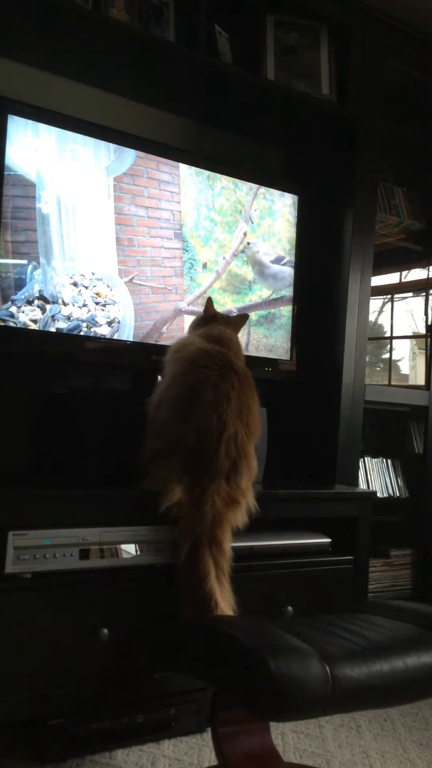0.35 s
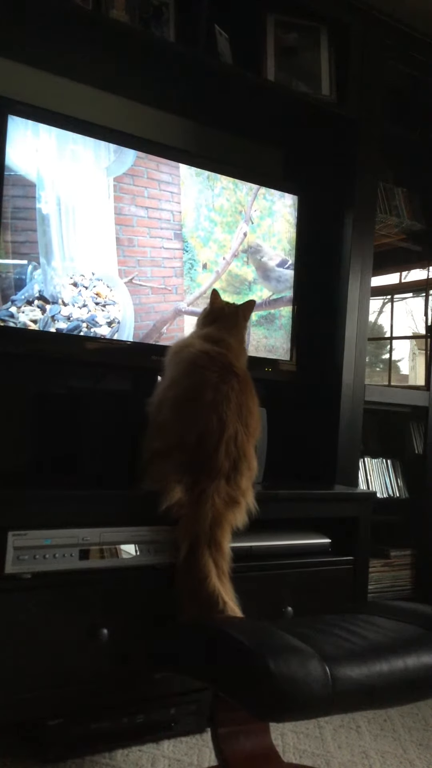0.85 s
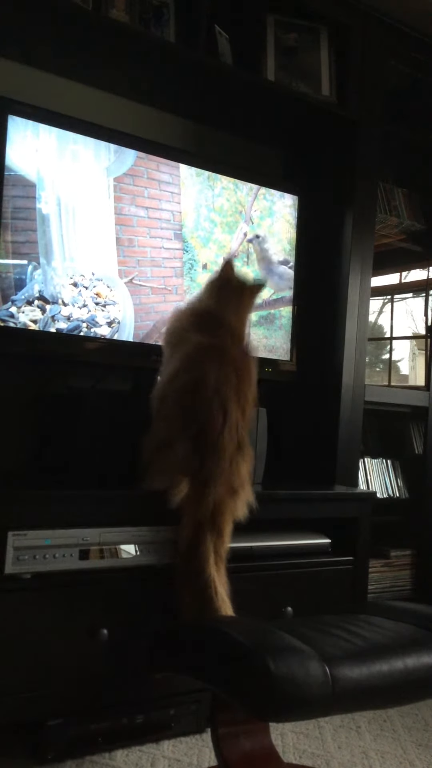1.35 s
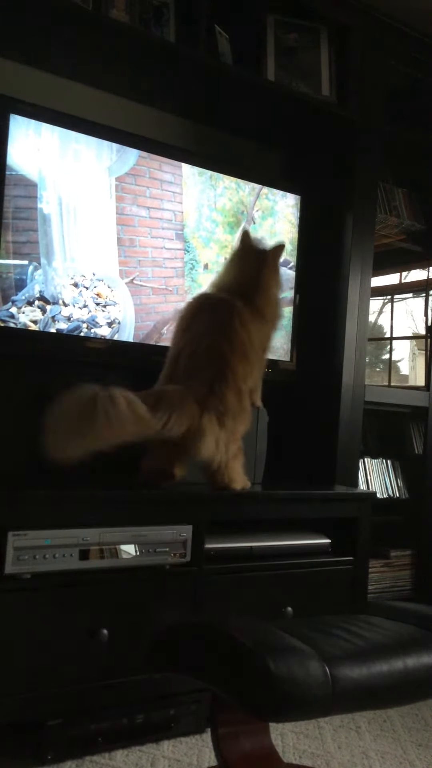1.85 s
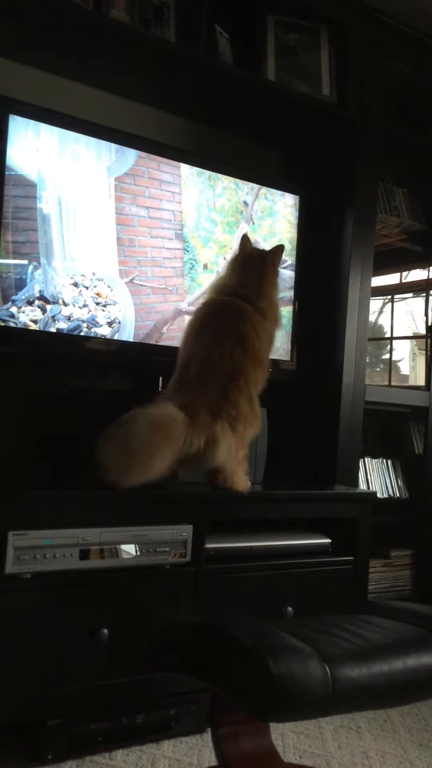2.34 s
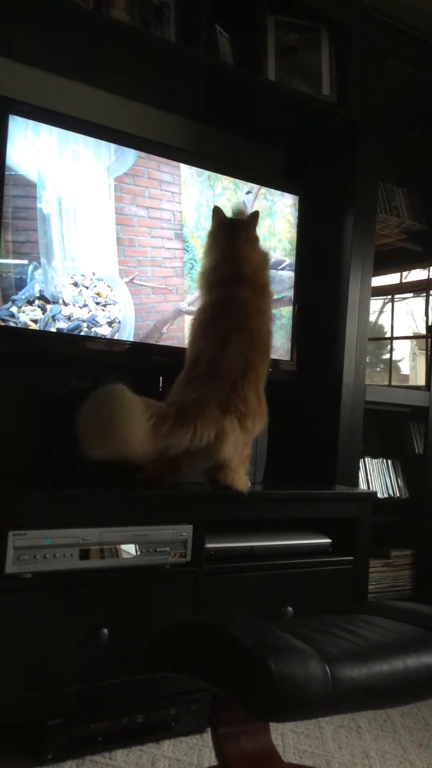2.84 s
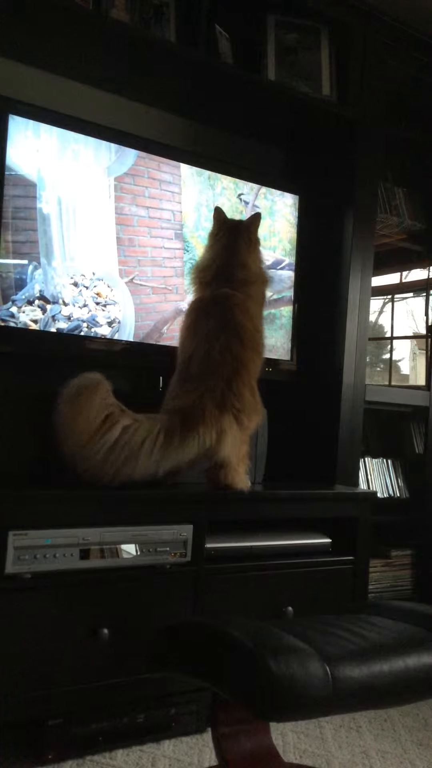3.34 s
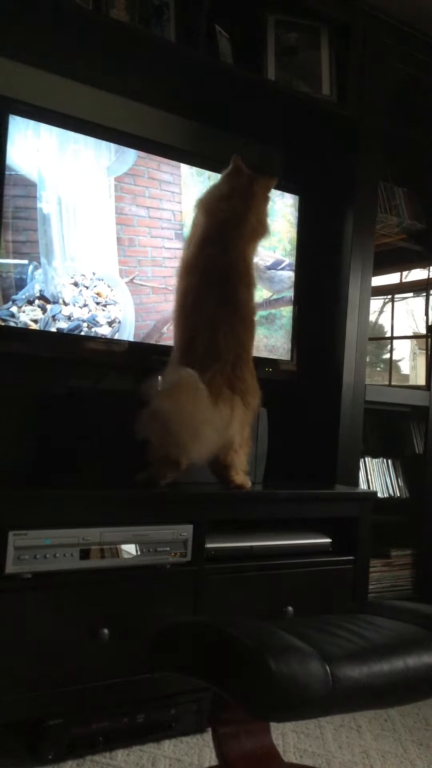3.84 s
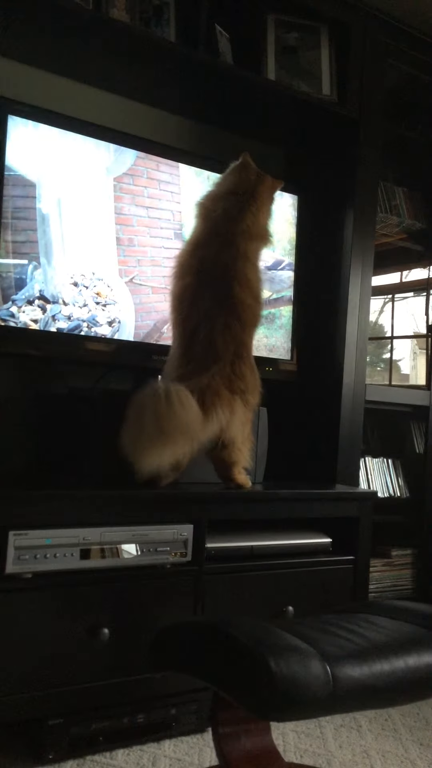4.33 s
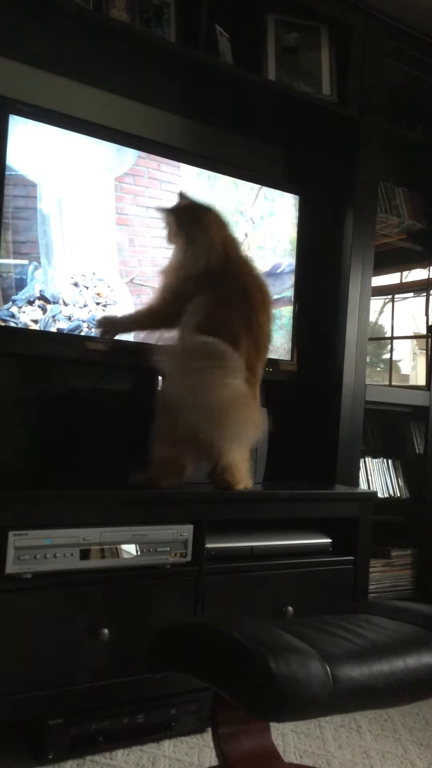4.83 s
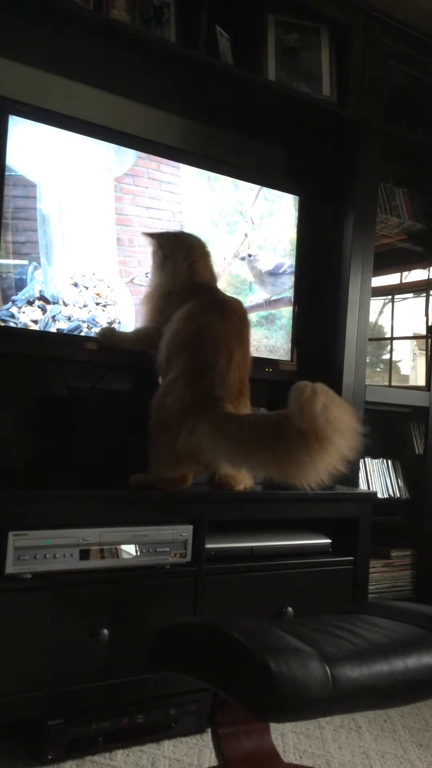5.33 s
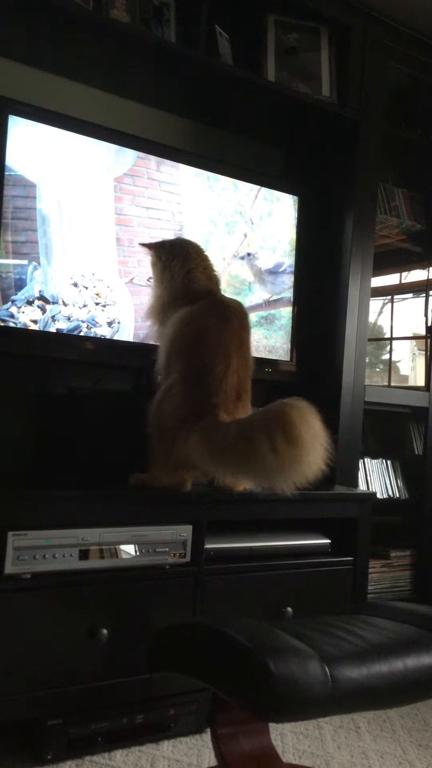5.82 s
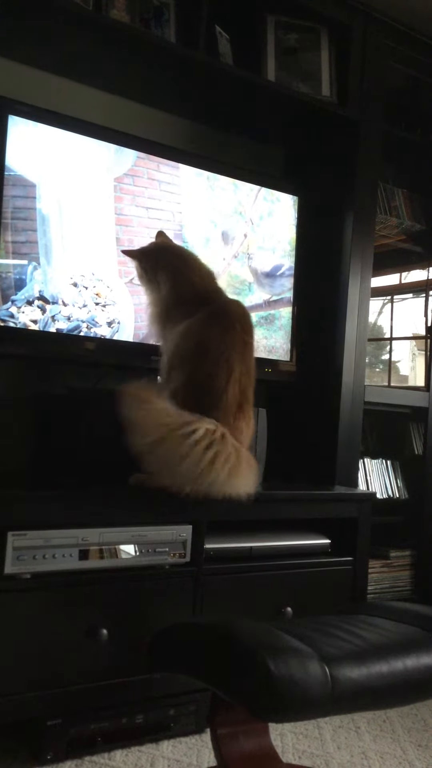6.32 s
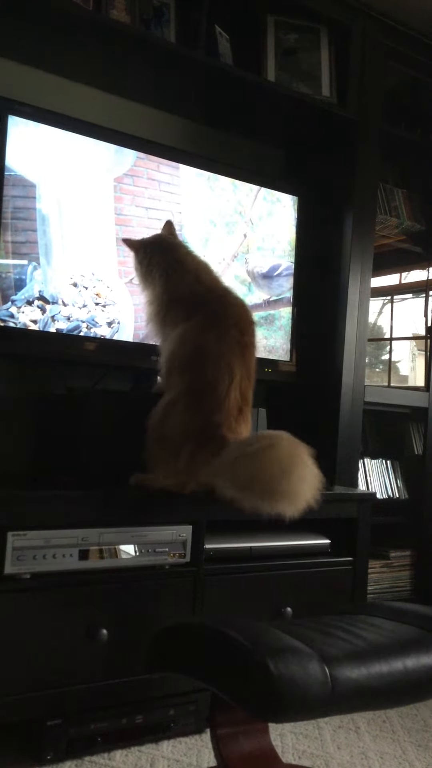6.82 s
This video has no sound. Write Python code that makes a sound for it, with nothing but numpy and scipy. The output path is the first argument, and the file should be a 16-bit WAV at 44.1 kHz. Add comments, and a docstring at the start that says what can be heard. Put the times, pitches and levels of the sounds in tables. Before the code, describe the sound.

In a furnished living room, a low engine drone from outside and faint hiss run throughout. After a quiet start, a cat lands on a wooden cabinet with a cluster of soft hollow knocks, then another double thump. Lighter claw taps and muffled pats follow, ending in one sharp click, then sparse faint touches. A phone microphone listens from a few metres away.

```python
"""A cat's paws knock, pat and scratch on a wooden cabinet in a furnished room, a few metres from a phone microphone.
Each contact is a swell of noise that rings resonances of panel, shelves, pad and claw; fur adds soft hiss.
An engine drones outside, a firing tone with overtones shifting down in pitch, heard through low room resonances.
Room air and microphone hiss, all shaped noise, lie under everything.
A few faint chirps, short sliding sines, come from a loudspeaker."""
import sys
import numpy as np
from scipy import signal
from scipy.fft import rfft, irfft, next_fast_len
from scipy.io import wavfile
from scipy.ndimage import uniform_filter1d, map_coordinates

SR = 44100
rng = np.random.default_rng(int(sys.argv[2]) if len(sys.argv) > 2 else 0)


def bounce(signal):
    """Save signal as a 16-bit WAV file at the path given by the first command-line argument."""
    frames = np.transpose(np.atleast_2d(signal))
    limited = np.clip(frames, -1, 1)
    pcm = np.round(limited * 32767).astype(np.int16)
    wavfile.write(sys.argv[1], SR, pcm)


def to_linear_factor(level_db):
    """Convert decibel levels (scalar or array-like) to linear amplitude factors."""
    exponent = np.asarray(level_db, float) / 20
    return 10 ** exponent


N = 316505  # samples

# resonances of pad on wood: centre_hz, width_hz, gain_db
PAD_MODES = [(717, 56, -2), (939, 78, 3.5), (1055, 94, 1.5), (1170, 46, 7.5), (1300, 72, 3), (1500, 70, -1),
             (1570, 67, 4.5), (1678, 74, 5), (1853, 117, 3), (2160, 320, -10)]
# resonances of claw on wood: centre_hz, width_hz, gain_db
CLAW_MODES = [(2060, 63, 3), (2360, 264, 10.5), (2795, 250, 12.5), (3550, 340, 0), (4340, 320, -3),
              (5530, 690, -13), (6500, 650, -16)]


def unit(x):
    """Brings a signal to rms 1."""
    return x / np.sqrt(np.mean(x ** 2) + 1e-20)


def along(points, hz):
    """Reads (Hz, value) points on a log frequency axis."""
    point_hz, value = np.transpose(points)
    return np.interp(np.log(hz + 1), np.log(point_hz + 1), value)


def curves(rows):
    """One value per sample for each column after the time."""
    s, *columns = np.transpose(rows)
    return [np.interp(np.arange(N) / SR, s, column) for column in columns]


def wobble(rate):
    """A smooth random curve, rate knots a second."""
    knots = rng.standard_normal(int(N * rate / SR) + 4)
    return map_coordinates(knots, [np.arange(N) * rate / SR])


def filtered(x, response):
    """Multiplies the spectrum of x by a complex response of frequency."""
    size = next_fast_len(len(x) + 8192)
    return irfft(rfft(x, size) * response(np.fft.rfftfreq(size, 1 / SR)), size)[:len(x)]


def resonant(x, modes, fall_hz):
    """x through (Hz, width Hz, dB) resonances, dull above fall_hz, brought to rms 1."""
    def response(f):
        peaks = 0
        for k, (centre, width, db) in enumerate(modes):
            sign = (-1) ** k  # neighbouring modes swing in opposite senses
            peaks = peaks + sign * to_linear_factor(db) * 1j * f * width / (centre * centre - f * f + 1j * f * width)
        return peaks / (1 + 1j * f / fall_hz) ** 2
    return unit(filtered(x, response))


def coloured(x, spectrum):
    """x with a smooth spectrum, brought to rms 1."""
    return unit(filtered(x, lambda hz: to_linear_factor(along(spectrum, hz))))


def combed(x, step_hz, depth_db):
    """Reflections off walls and furniture leave fixed fine peaks and dips in a steady noise."""
    knots = rng.standard_normal(SR // 20)
    return unit(filtered(x, lambda hz: to_linear_factor(depth_db * map_coordinates(knots, [hz / step_hz]))))


def patchy(x, depth_db):
    """The noise swells and fades in small patches of time and pitch."""
    z = signal.stft(x, nperseg=512)[2]
    field = uniform_filter1d(rng.standard_normal(z.shape), size=4, axis=0)
    field = uniform_filter1d(field, size=12, axis=1)
    return signal.istft(z * to_linear_factor(depth_db * unit(field)), nperseg=512)[1][:N]


def tone(hz, db, waver_rad, flutter_db, rate):
    """A sine whose phase and level wander."""
    level = np.sqrt(2) * to_linear_factor(db + flutter_db * wobble(rate))
    return level * np.sin(2 * np.pi * np.cumsum(hz) / SR + waver_rad * wobble(rate))


def tail():
    """One answer of the room: noise in which each frequency dies at its own speed."""
    # decay of the furnished room: pitch_hz, t60_s
    room_decay = [(200, 0.038), (500, 0.4), (2000, 0.31), (10000, 0.075)]
    hz, t, z = signal.stft(rng.standard_normal(SR // 2), SR, nperseg=256)
    fading = z * to_linear_factor(-60 * t / along(room_decay, hz)[:, None])
    answer = signal.istft(fading, SR, nperseg=256)[1]
    return answer / np.linalg.norm(answer)


def roomed(x, wet_db):
    """Direct sound, then the room 6 ms later."""
    total = len(x) + SR // 2
    late = signal.fftconvolve(np.pad(x, (260, 0)), tail())[:total]
    return np.pad(x, (0, SR // 2)) + to_linear_factor(wet_db) * late


def add_at(out, start_s, sound):
    """Lays a sound into the track at its start time."""
    first = round(start_s * SR)
    out[first:first + len(sound)] += sound


def air():
    """Broad rumble, noise caught in the room's resonances and an even hiss."""
    # broad low noise before its wander: time_s, rumble_db, boom_db
    air_levels = [(0, -50, -54.5), (.4, -54.5, -56), (.8, -46.5, -53.5), (1.5, -47, -56),
                  (2.15, -42, -56.5), (2.5, -51, -56), (3.3, -48.5, -53.5), (3.75, -53.5, -54),
                  (3.95, -43.5, -53.5), (4.5, -50.5, -56.5), (4.85, -46, -51.5), (5.05, -51.5, -51.5),
                  (5.6, -47.5, -55.5), (6.4, -50.5, -55), (7.18, -48.5, -63)]
    # relative spectrum of the rumble: pitch_hz, level_db_per_hz
    rumble_spectrum = [(18, -27), (30, -24.5), (45, -7), (70, -9.5), (100, -1.5), (135, -9.5), (160, -12.5),
                       (200, -13), (400, -120)]
    # low room resonances: centre_hz, width_hz, gain_db
    boom_modes = [(328, 96.5, -4.5), (407.6, 11.3, -7.5), (252.7, 19, -9), (180.5, 17, 3.5)]
    # middle and upper room resonances: centre_hz, width_hz, gain_db
    murmur_modes = [(477, 33, -3), (660, 114, -3), (705, 113, 2), (937, 109, 2.5), (1234.5, 55, 4),
                    (1645, 123, -1.5), (2205, 120, -11.5), (2598, 258, -9.5), (3370, 480, -15),
                    (4000, 500, -12.5), (4800, 240, -15), (5060, 250, -31)]
    # relative spectrum of the hiss: pitch_hz, level_db_per_hz
    hiss_spectrum = [(3000, -44), (5000, 3), (5900, -4), (6900, 0), (8500, -2), (10200, -5), (11300, -2.5),
                     (11800, -2), (12300, -2), (13200, -8), (15000, -7.5), (15300, -50)]
    murmur_db, hiss_db = -65, -80.5
    rumble_db, boom_db = curves(air_levels)
    white = rng.standard_normal((4, N))
    waver = wobble(8.1)  # one slow random waver shared by the murmur and the hiss
    rumble = to_linear_factor(rumble_db + 2.35 * wobble(12)) * coloured(white[0], rumble_spectrum)
    boom = to_linear_factor(boom_db + 2.5 * wobble(2.94)) * resonant(white[1], boom_modes, fall_hz=650)
    murmur = resonant(patchy(white[2], depth_db=2.0), murmur_modes, fall_hz=5300)
    murmur = to_linear_factor(murmur_db + 0.5 * waver) * combed(murmur, step_hz=20, depth_db=3.5)
    hiss = combed(coloured(white[3], hiss_spectrum), step_hz=28, depth_db=2.8)
    return rumble + boom + murmur + to_linear_factor(hiss_db + 0.67 * waver) * hiss


def engine():
    """A low firing tone and its overtones; an order stands out while it lies on a resonance of the room."""
    # engine speed: time_s, firing_hz
    firing = [(0, 83.54), (.95, 84.77), (1.13, 67.84), (2.2, 64), (3.5, 63.57), (4.5, 61.35), (5.2, 60.32),
              (6, 59.75), (7.18, 58.18)]
    # firing tone indoors, before smoothing and a 2.5 dB lift: time_s, level_db
    firing_level = [(0.0, -35), (0.035, -57), (0.16, -60.5), (0.82, -45), (0.86, -53), (1.16, -44),
                    (1.28, -59), (1.32, -45), (1.86, -51), (1.9, -41), (2.08, -68), (2.24, -41),
                    (2.46, -54.5), (2.76, -41.5), (2.84, -47), (2.88, -71), (3.24, -44.5), (3.34, -58),
                    (3.44, -45.5), (3.84, -57.5), (3.88, -47), (4.78, -42.5), (4.84, -51.5), (5.26, -40.5),
                    (6.56, -47), (6.71, -45), (7.18, -51)]
    # overtones before smoothing, order gain and room lift: time_s, level_db
    overtone_level = [(0.0, -60.5), (0.4, -66.5), (0.42, -66), (0.56, -57), (1.56, -57.5), (1.58, -51.5),
                      (2.32, -57.5), (2.58, -47.5), (3.0, -53.5), (3.34, -42), (3.38, -75), (3.42, -45.5),
                      (3.8, -52), (4.22, -41.5), (4.34, -54.5), (4.42, -39.5), (4.48, -61.5), (4.68, -43),
                      (4.78, -49), (4.88, -39), (5.04, -62), (5.1, -42.5), (5.16, -61), (5.24, -43),
                      (5.5, -49), (5.86, -47), (5.9, -62), (6.0, -42), (6.13, -52), (6.2, -39.5),
                      (6.34, -49.5), (6.54, -41), (6.86, -46.5), (7.18, -46.5)]
    # overtones heard: order (multiple of the firing pitch), gain_db
    orders = [(2, 1.5), (3, -0.5), (4, 4), (5, 0.5), (6, -12), (8, -3)]
    # room resonances that lift whichever order passes through them: centre_hz, width_hz, gain_db
    lift_modes = [(132, 38, -15), (181, 35, 0), (340.5, 38, -7.5), (473.4, 14.4, -21.5)]
    # narrow room resonance: centre_hz, width_hz, gain_db
    singing_modes = [(341.2, 4.5, 0)]
    # loudness of that resonance, before a 1 dB cut: time_s, level_db
    singing_level = [(0.0, -75), (0.24, -54.5), (0.3, -74), (0.58, -56), (0.7, -83), (0.86, -60),
                     (1.28, -71), (1.69, -65), (1.78, -76), (1.86, -65), (4.65, -63.5), (4.73, -55.5),
                     (5.29, -64.5), (6.27, -50.5), (6.31, -71), (6.59, -53.5), (7.11, -57.5), (7.17, -51)]
    hz, = curves(firing)
    low_db = uniform_filter1d(curves(firing_level)[0], size=900)
    overtone_db = uniform_filter1d(curves(overtone_level)[0], size=900)
    calm_db = uniform_filter1d(overtone_db, size=SR // 2)  # the higher orders follow only the slow swell

    def lift(f):
        return sum(to_linear_factor(db) / (1 + (2 * (f - centre) / width) ** 4) for centre, width, db in lift_modes)

    overtones = np.zeros(N)
    for k, db in orders:
        order_db = (calm_db if k > 3 else overtone_db) + db
        overtones += lift(k * hz) * tone(k * hz, order_db, 0.3 + 0.1 * k, 0.8 + 0.35 * k, rate=14)
    singing = resonant(rng.standard_normal(N), singing_modes, fall_hz=900)
    singing *= to_linear_factor(curves(singing_level)[0] - 1.0)
    return tone(hz, low_db + 2.5, waver_rad=0.12, flutter_db=1.5, rate=12) + overtones + singing


def chirps():
    """Short husky whistles, sines that slide down a little under a rounded swell."""
    # faint chirps, sounding 3 % above the pitch at first and 0.8 % at last:
    # middle_s, pitch_hz, level_db, length_s
    chirp_list = [(2.171, 4000, -71, 0.044), (2.312, 3800, -71, 0.064), (3.762, 8250, -76, .05),
                  (3.763, 3800, -62, 0.033), (3.982, 1758, -63, 0.028), (5.184, 2037, -60.5, 0.034),
                  (5.21, 2150, -71, 0.027), (6.709, 2820, -67.5, 0.046)]
    out = np.zeros(N + SR)
    for s, hz, db, length in chirp_list:
        t = np.arange(round(length * SR)) / SR
        husk = .6 + .8 * unit(uniform_filter1d(rng.standard_normal(SR // 10), size=70))[:len(t)]
        swell = np.sin(np.pi * t / length) ** 2
        whistle = np.sin(2 * np.pi * hz * t * (1.03 - 0.011 * t / length))
        add_at(out, s - length / 2, roomed(to_linear_factor(db) * husk * swell * whistle, wet_db=-13))
    return out[:N]


def brushes():
    """Fur brushing past without a knock: a soft swell of hiss and finer fizz for each stroke."""
    # strokes of fur: middle_s, hiss_db, length_s, fizz_db (against the hiss)
    strokes = [(0.62, -81, 0.099, -11), (1.454, -75, 0.057, -3), (1.63, -67, 0.046, -10),
               (1.665, -76, .05, -16), (1.752, -72, 0.055, -6), (3.533, -77, 0.024, 0),
               (3.626, -69, 0.034, -15), (3.74, -85, .12, 4), (3.98, -87.5, .18, 2),
               (4.837, -83, 0.24, 1.5), (4.946, -80, 0.022, 6), (6.73, -76, .05, -5)]
    # relative spectrum of the hiss: pitch_hz, level_db_per_hz
    stroke_spectrum = [(700, -28), (2500, 7.5), (5000, 3), (7500, -2), (11500, -17), (14000, -12),
                       (15200, -18), (15400, -47)]
    # relative spectrum of the fizz: pitch_hz, level_db_per_hz
    fizz_spectrum = [(6000, -40), (9000, 0), (12500, 1), (15000, -3), (15400, -47)]
    t, out = np.arange(N) / SR, np.zeros(N)
    hiss = to_linear_factor(3.0 * wobble(60)) * coloured(rng.standard_normal(N), stroke_spectrum)
    fizz = to_linear_factor(3.0 * wobble(60)) * coloured(rng.standard_normal(N), fizz_spectrum)
    for s, db, length, fizz_db in strokes:
        swell = np.exp(-(2 * (t - s) / length) ** 2)
        out += to_linear_factor(db) * swell * (hiss + to_linear_factor(fizz_db) * fizz)
    return out


def shuffles():
    """A sliding pad catches and slips at random; each slip rings the wood and a little of the claw."""
    # pads sliding on the wood between contacts: middle_s, level_db, length_s
    slides = [(1.635, -61, .06), (1.69, -62, .1), (2.06, -62, .07), (3.64, -63, .06), (3.759, -70, .08),
              (3.93, -68, 0.13), (4.366, -70, .16), (4.64, -69, .12), (4.78, -69, .16),
              (6.085, -69.5, 0.23)]
    slips_per_s, slip_spread_db, scrape_db = 1500, 14, -11  # rate, range of size, the claw's share
    t, chance = np.arange(N) / SR, rng.random((2, N))
    slips = (chance[0] < slips_per_s / SR) * to_linear_factor(slip_spread_db * chance[1])
    slips = slips * rng.choice([-1, 1], size=N)
    rub = resonant(slips, PAD_MODES, fall_hz=3000)
    rub += to_linear_factor(scrape_db) * resonant(slips, CLAW_MODES, fall_hz=8240)
    swells = sum(to_linear_factor(db) * np.exp(-(2 * (t - s) / length) ** 2) for s, db, length in slides)
    return roomed(rub * swells, wet_db=-6.5)[:N]


def ticks():
    """A claw tip clicks on the hard finish: a crack under a millisecond long rings the claw's resonances."""
    # bare claw tips, before a 22 dB cut: start_s, level_db, treble_db (against the claw)
    claw_tips = [(3.605, -57, -20), (3.868, -65, -16), (4.9331, -42, -21), (4.9372, -53.5, 1)]
    out, t = np.zeros(N + SR), np.arange(SR // 20) / SR
    for s, db, treble_db in claw_tips:
        crack = to_linear_factor(-60 * t / .0025) * rng.standard_normal(len(t))
        treble = resonant(crack, [(11900, 2400, 0)], fall_hz=15000)
        click = resonant(crack, CLAW_MODES, fall_hz=8200) + to_linear_factor(treble_db) * treble
        add_at(out, s, roomed(to_linear_factor(db - 22.0) * click, wet_db=-0.5))
    return out[:N]


def thuds():
    """Soft weight landing: a padded push sets one low panel mode and a neighbour swinging."""
    # soft landings, level before the rise and fall: start_s, level_db, pitch_hz, rise_s, t60_s
    landings = [(1.607, -30, 400, 0.0023, 0.031), (1.615, -35.5, 337, 0.0023, 0.087),
                (1.641, -28.5, 105, 0.0054, 0.17), (1.645, -38.5, 235, 0.0044, 0.14),
                (1.67, -36.5, 266.4, .006, 0.16), (1.81, -24.5, 266, 0.0069, 0.071),
                (2.023, -24.5, 280, 0.0067, 0.069), (2.037, -25.5, 254, 0.0044, 0.074),
                (2.921, -36, 319, 0.0048, 0.069), (3.61, -40.5, 393.5, 0.0021, 0.11),
                (3.866, -36.5, 315, 0.0055, 0.13), (4.574, -40, 276, 0.0054, 0.089),
                (4.944, -36.5, 321, 0.0046, 0.15), (4.952, -32, 235, 0.0034, 0.071)]
    out, t = np.zeros(N + SR), np.arange(SR // 5) / SR
    for s, db, hz, rise, t60 in landings:
        swing = np.sin(2 * np.pi * hz * t) + .3 * np.sin(2 * np.pi * .8 * hz * t)
        push = 1 - np.exp(-(t / rise) ** 2)
        add_at(out, s, roomed(to_linear_factor(db - 60 * t / t60) * push * swing, wet_db=-8.0))
    return out[:N]


def paws():
    """A pad rolls onto the wood: a swell of uneven small jolts rings panel and shelves, claw and fur brush along."""
    # paw contacts, knock before a 5 dB cut: start_s, knock_db, claw_db (against the knock),
    # contact_s (time to the fullest press), spot_hz (pitch that the spot under the pad favours)
    contacts = [(.725, -72, 8.5, .0072, 1200), (1.605, -55, -8, 0.0061, 700),
                (1.622, -46, -14, 0.0086, 900), (1.628, -52, -7, 0.0084, 1910),
                (1.648, -51, -8, 0.013, 1800), (1.668, -48.5, -20, 0.0084, 1060),
                (1.69, -56.5, -8, 0.014, 1500), (1.755, -51, -15, 0.011, 1240), (1.811, -55, -5, .008, 990),
                (2.016, -43, -12.5, 0.0065, 790), (2.021, -45.5, -15, 0.0088, 1870),
                (2.024, -41.5, -16, 0.01, 1300), (2.04, -46, -21, 0.006, 840), (2.725, -69, 5, .011, 2000),
                (3.535, -64, -4, .008, 900), (3.604, -51.5, 1, 0.0037, 1210),
                (3.616, -57.5, -4.5, 0.016, 900), (3.734, -65, 2, 0.014, 1200),
                (3.762, -69, -7, 0.0068, 1200), (3.865, -55, -3, 0.0062, 990), (3.9, -68, -4, 0.029, 1210),
                (4.299, -60.5, -28, 0.029, 1199), (4.348, -58, -22, 0.016, 1680),
                (4.41, -60.5, -25, 0.019, 940), (4.514, -52, -15, 0.01, 1490),
                (4.569, -52, -4, 0.0086, 900), (4.611, -54, -22, 0.0067, 1280),
                (4.666, -57, -24, .013, 1180), (4.716, -54.5, -6, 0.009, 1700),
                (4.748, -51.5, -24, 0.0084, 950), (4.803, -65, 2, 0.01, 1770),
                (4.831, -55, -27, 0.013, 1310), (4.933, -48, 6, 0.0037, 2000),
                (4.938, -50, -9, 0.0097, 1700), (4.944, -56, -15, 0.0085, 1800),
                (5.15, -56, -14, 0.011, 1582), (5.742, -69, 0, 0.0098, 1201),
                (5.998, -59, -27, 0.053, 1211), (6.19, -62, -16, .0076, 1200),
                (6.7, -67.5, -1, 0.028, 1790), (7.16, -50.5, -16, 0.0072, 1212)]
    # panel under the pad: centre_hz, width_hz, gain_db
    panel_modes = [(207, 18, -2), (275, 59, 7), (310, 114, -1.5), (400, 130, -9)]
    # shelves: centre_hz, width_hz, gain_db
    shelf_modes = [(515, 68, 1), (650, 49, 1.3), (791, 45, 1.6)]
    # relative spectrum of the fur: pitch_hz, level_db_per_hz
    fur_spectrum = [(3500, -51), (5000, -4), (6000, -1.5), (7500, -10), (9500, -2), (11500, -12),
                    (14000, -4), (15100, -12), (15300, -47)]
    panel_db, fur_db = -4.5, -10.5  # against the knock; against the claw
    favour_db, favour_octaves = 13, .25  # lift of the modes near the spot and its reach
    out, t = np.zeros(N + SR), np.arange(SR // 5) / SR
    for s, db, claw_db, contact, spot_hz in contacts:
        u = t / contact
        press = (u * np.exp(1 - u)) ** 1.6  # rounded touch, slower release
        noise = rng.standard_normal((3, len(t)))
        unevenness = to_linear_factor(2.5 * unit(uniform_filter1d(noise[1], size=120)))
        jolts = press * noise[0] * unevenness
        weight_db = .5 * (db + 49.0)  # only heavy blows reach the shelves and sound bright
        skin = []
        for centre, width, gain_db in PAD_MODES:
            nearness = np.exp(-(np.log2(centre / spot_hz) / favour_octaves) ** 2)
            skin.append((centre, width, gain_db + favour_db * nearness))
        panel = to_linear_factor(panel_db) * resonant(jolts, panel_modes, fall_hz=760)
        shelves = to_linear_factor(weight_db) * resonant(jolts, shelf_modes, fall_hz=1400)
        pad = resonant(jolts, skin, fall_hz=4800 * to_linear_factor(0.6 * weight_db))
        claw = to_linear_factor(claw_db) * resonant(jolts, CLAW_MODES, fall_hz=8300)
        fur = to_linear_factor(claw_db + fur_db) * unit(press * coloured(noise[2], fur_spectrum))
        level = to_linear_factor(db - 5.0) / unit(press).max()  # short and long contacts peak alike
        add_at(out, s, roomed(level * (panel + shelves + pad + claw + fur), wet_db=-10))
    return out[:N]


def scene():
    """Everything at one microphone."""
    background = air() + engine() + chirps()
    cat = brushes() + shuffles() + ticks() + thuds() + paws()
    return (background + cat)[None]


def low_pass(x):
    """Removes everything above the highest recorded frequency."""
    return signal.sosfilt(signal.butter(12, 15180, fs=SR, output="sos"), x)


def record(dry):
    """The phone microphone loses the deepest bass, below about 35 Hz, and everything from 15.2 kHz up."""
    top_hz, bass_hz = 15200, 35
    heard = filtered(dry[0], lambda hz: (hz < top_hz) * (1j * hz / (bass_hz + 1j * hz)) ** 2)
    return low_pass(heard[None])


dry = scene()
out = record(dry)
bounce(out)
```